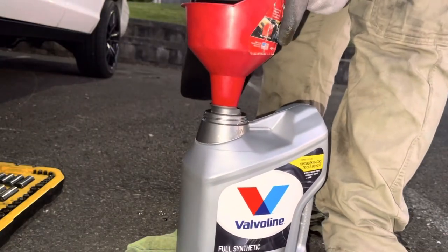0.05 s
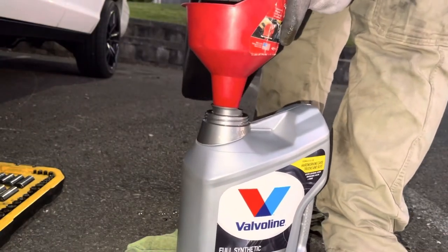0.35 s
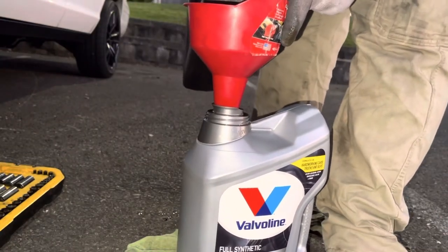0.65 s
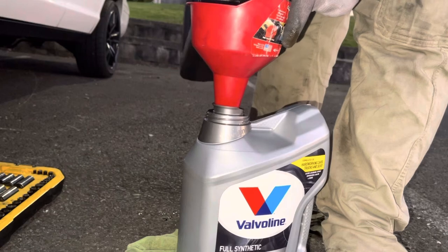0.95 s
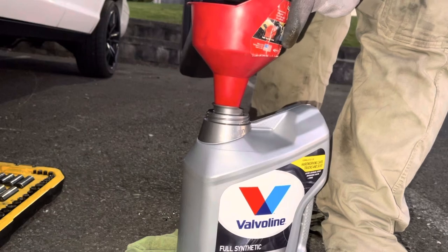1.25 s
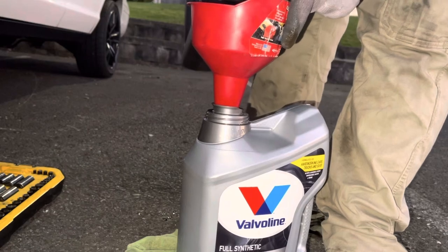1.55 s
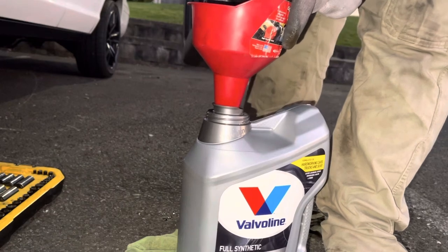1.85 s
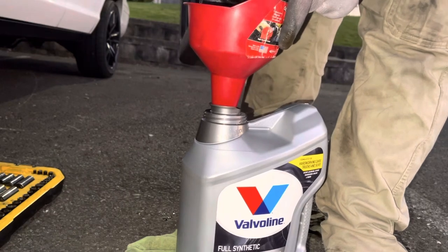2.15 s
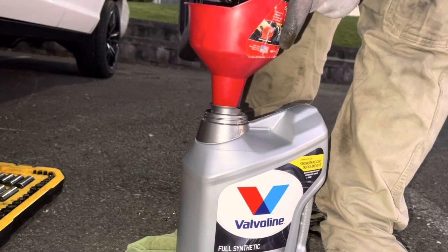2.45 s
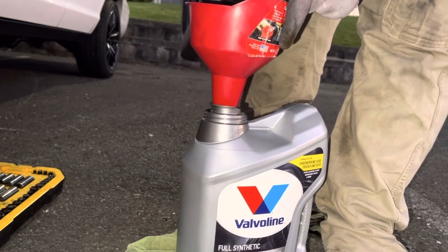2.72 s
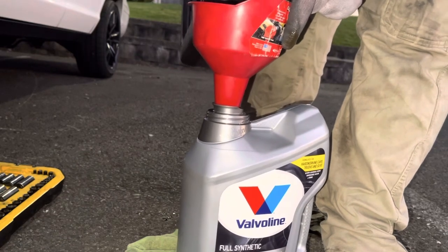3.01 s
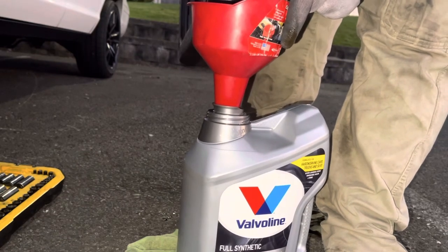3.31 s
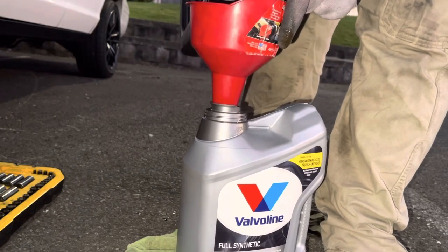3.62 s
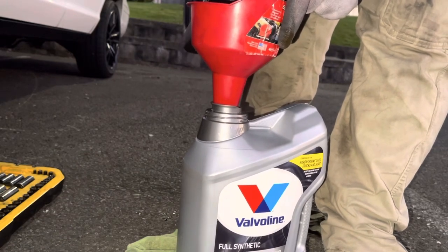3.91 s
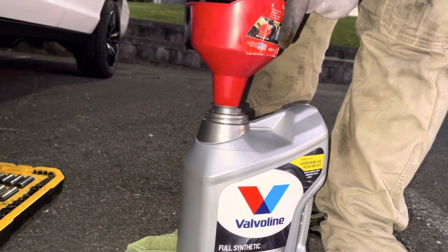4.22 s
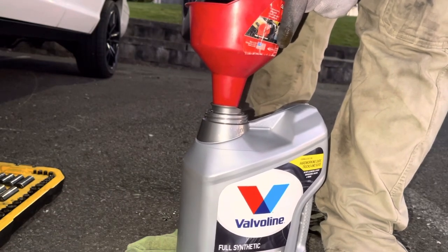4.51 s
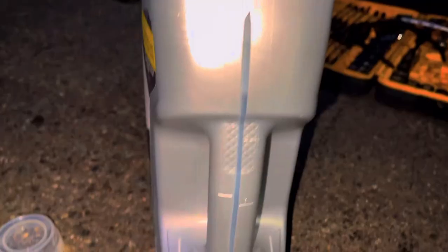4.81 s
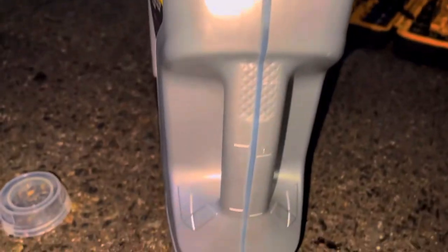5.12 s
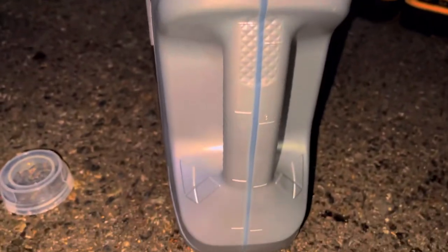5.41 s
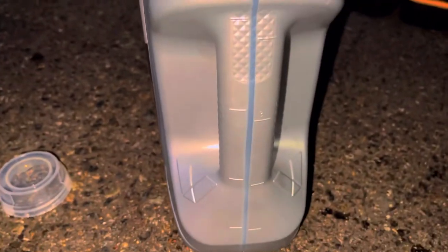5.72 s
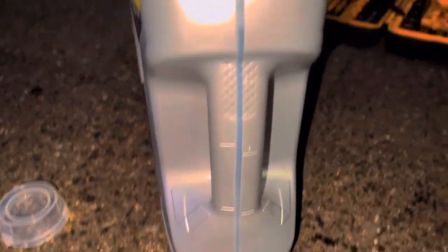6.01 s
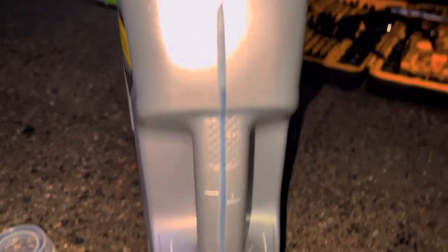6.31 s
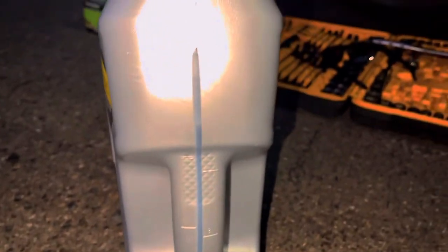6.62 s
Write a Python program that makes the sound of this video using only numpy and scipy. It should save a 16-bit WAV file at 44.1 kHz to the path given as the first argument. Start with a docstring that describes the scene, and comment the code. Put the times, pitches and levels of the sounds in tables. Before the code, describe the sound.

Light plastic clicks and rubbing outdoors over a low traffic rumble, followed by a jug's sharp knock and duller bump.

```python
"""On a driveway, a plastic funnel shifts in the neck of an oil jug: light clicks, rubbing and scrapes,
all tiny slips ringing through its shell. Then the jug knocks on the asphalt close by and rocks over grit
onto its base with a duller bump. Distant traffic rumbles throughout, joined by an engine's hum and one
faint bird whistle; a thin whine mostly fades near the end. The level dips once, after the last click."""
import sys
import numpy as np
from scipy import signal
from scipy.fft import rfft, irfft, next_fast_len
from scipy.io import wavfile
from scipy.ndimage import uniform_filter1d

SR = 44100
rng = np.random.default_rng(int(sys.argv[2]) if len(sys.argv) > 2 else 0)


def dump_mix(stems):
    """Bounce the given channels to the path in sys.argv[1] as a 16-bit WAV at rate SR."""
    frames = np.atleast_2d(stems).T  # one column per channel
    limited = np.clip(frames, -1, 1)  # hard clip at full scale
    pcm = np.round(limited * 32767).astype(np.int16)
    wavfile.write(sys.argv[1], SR, pcm)


N = 302110
TIME = np.arange(N) / SR


def undb(db):
    """Decibels to gain."""
    return 10 ** (np.asarray(db) / 20)


def unit(x):
    """Scale to an rms of one."""
    return x / np.sqrt(np.mean(x ** 2))


def curve(rows, column=1):
    """Automation: join the rows of a table by straight lines in time."""
    rows = np.array(rows)
    return np.interp(TIME, rows[:, 0], rows[:, column])


def along(points, hz):
    """Read (frequency, value) points on a log-frequency axis."""
    points = np.array(points)
    return np.interp(np.log(hz + 1), np.log(points[:, 0]), points[:, 1])


def shape(x, response):
    """Filter by a response given as a function of frequency."""
    size = next_fast_len(x.shape[-1])
    hz = np.arange(size // 2 + 1) * SR / size
    return irfft(rfft(x, size) * response(hz), size)[..., :x.shape[-1]]


def band(x, lo_hz, hi_hz):
    """Causal band-pass."""
    sos = signal.butter(2, [lo_hz, min(hi_hz, SR / 2 - 1)], "band", fs=SR, output="sos")
    return signal.sosfilt(sos, x)


def lowpass(x, hz):
    """Steep causal low-pass."""
    return signal.sosfilt(signal.butter(4, min(hz, SR / 2 - 1), fs=SR, output="sos"), x)


def walk(rate_hz):
    """Smooth random modulation with a spread near one."""
    knots = rng.standard_normal(512)
    drift = np.interp(TIME * rate_hz, np.arange(len(knots)), knots)
    return uniform_filter1d(drift, int(SR / rate_hz / 2)) * np.sqrt(2)


def grit(size, spread_db, apart):
    """Stereo grains of unequal strength, like tiny slips; a part reaches each side by its own path."""
    slips = rng.standard_normal((3, size)) * undb(spread_db * rng.standard_normal(size))
    return slips[0] + apart * slips[1:]


def pan(db):
    """Left and right gains; positive decibels lean left."""
    return undb(np.array([[db], [-db]]) / 2)


def add(out, s, sound):
    """Mix a sound in at time s."""
    start = int(s * SR)
    out[:, start:start + sound.shape[-1]] += sound[:, :N - start]


# tone of the road noise: (frequency [Hz], relative density [dB])
TRAFFIC_SPECTRUM = [(26, -30), (45, -5.5), (70, -1), (124, -5), (153, -10.5), (189, -12.5), (289, -17.5),
                    (341, -21), (690, -31.5), (1100, -38), (1810, -49.5), (3340, -58.5), (3760, -64.5),
                    (8380, -66.5), (12500, -87.5), (16200, -106), (22000, -120)]
# its stereo image: (frequency [Hz], left-right correlation [-1..1])
TRAFFIC_CORRELATION = [(60, 0.98), (130, 0.92), (290, 0.51), (450, 0.31), (700, -0.59), (1300, -0.36),
                       (2400, 0.24), (5000, 0.18), (14000, 0.41)]
# splits between bass, low mids, high mids and treble: (frequency [Hz])
TRAFFIC_CROSSOVERS = [150, 480, 900]
# fader rides: (time [s], bass gain [dB], low-mid gain [dB], high-mid gain [dB])
TRAFFIC_RIDES = [(0, 0.5, -3.5, 6), (1, 0.5, 1.5, -3), (1.7, -3, 0.5, -2), (3, 0, -3, 3),
                 (4.7, -2.5, 0.5, -3.5), (5, -0.5, 0.5, 4), (6.85, -1, 0.5, 3.5)]


def traffic(level_db=-42.5, bass_waver_db=-1.2, mids_waver_db=0.9, pan_db=0.8):
    """A bed of far road noise: centred bass and diffuse mids, each wavering on its own."""
    mid, side = (shape(rng.standard_normal(N), lambda f: undb(along(TRAFFIC_SPECTRUM, f)))
                 for _ in range(2))
    side = shape(side, lambda f: np.sqrt(2 / (1 + np.clip(along(TRAFFIC_CORRELATION, f), -.9, .9)) - 1))
    road = (mid + side * np.array([[1], [-1]])) / np.std(mid)
    bass, to_low_mids, to_high_mids = (shape(road, lambda f: 1 / (1 + (f / hz) ** 4))
                                       for hz in TRAFFIC_CROSSOVERS)
    rumble = bass * undb(curve(TRAFFIC_RIDES) + bass_waver_db * walk(5.9))
    low_mids = (to_low_mids - bass) * undb(curve(TRAFFIC_RIDES, column=2))
    high_mids = (to_high_mids - to_low_mids) * undb(curve(TRAFFIC_RIDES, column=3))
    roar = (low_mids + high_mids) * undb(mids_waver_db * walk(5.6))
    treble = road - to_high_mids
    return (rumble + roar + treble) * undb(level_db) * pan(pan_db)


# thin tones: (pitch [Hz], level [dB], drop near the end [dB])
WHINE_TONES = [(3350, -84, 26), (3460, -94.5, -1.5), (3280, -99.5, 1.5), (11200, -101, -1)]
# faint narrow bands of high hiss: (centre [Hz], width [Hz], level [dB])
HISS_BANDS = [(3314, 480, -88), (8480, 400, -93), (11770, 150, -103)]


def whine(fade_at_s=5.78, fade_s=0.23, hiss_drop_db=3):
    """Faint high tones, steady in pitch, with narrow hiss; the strongest fades out near the end."""
    fade = np.clip((TIME - fade_at_s) / fade_s, 0, 1)
    tones = sum(undb(db - drop_db * fade + .5 * walk(15)) * unit(np.sin(2 * np.pi * hz * TIME))
                for hz, db, drop_db in WHINE_TONES)
    hiss = 0
    for hz, width, db in HISS_BANDS:
        grains = grit(N, spread_db=-3.5, apart=1.0)
        hiss += undb(db) * unit(shape(grains, lambda f: 1 / (1 + (2 * (f - hz) / width) ** 2)))
    return tones + hiss * undb(-hiss_drop_db * fade)


# the funnel's plastic body resonances: (centre [Hz], width [Hz], gain [dB])
FUNNEL_MODES = [(238, 20.5, 9), (317, 26, 11.5), (422, 100, 3.5), (600, 142, 4.5), (1027, 133, 5.5),
                (1232, 136, 0.5), (1446, 137, 2), (1930, 140, -3), (2306, 390, -9), (3270, 100, -6.5),
                (3820, 570, -10.5), (5930, 900, -51), (8100, 1500, -30)]


def shell(x, stretch=1):
    """Ring the funnel's modes, which a squeeze stretches in pitch; neighbours swing in opposite senses."""
    def response(f):
        f = f / stretch
        return sum((-1) ** k * undb(db) * 1j * f * width / (hz ** 2 - f ** 2 + 1j * f * width)
                   for k, (hz, width, db) in enumerate(FUNNEL_MODES))
    return shape(x, response)


def click(wall_db, cone_db, rim_db, edge_db, slip_s, top_hz,
          rise_s=0.00011, scatter_db=-20, scatter_s=0.058, squeeze=0.053, soft_catch_db=-65):
    """A snap and a burst of slips through the funnel, with a faint scatter from the ground and car."""
    t = TIME[:SR // 5]
    slips = unit(grit(len(t), spread_db=5.0, apart=0.29)) * np.exp(-t / slip_s)
    scatter = rng.standard_normal((2, len(t))) * undb(scatter_db) * np.exp(-t / scatter_s)
    snap = undb(wall_db - soft_catch_db) * (t == t[SR // 1000])  # a harder catch lets go more cleanly
    contact = snap + (slips + scatter) * (1 - np.exp(-t / rise_s))
    ring = shell(contact, stretch=1 + squeeze * rng.uniform(-1, 1))
    # the place of contact sets how much the hollow cone, its wall, its rim and its edge take up
    cone, wall, rim = band(ring, 182, 470), band(ring, 930, 1590), band(ring, 2280, 3070)
    edge = lowpass(band(ring, 3400, 16000), top_hz)
    out = 0
    for part, db in ((cone, cone_db), (wall, 0), (rim, rim_db), (edge, edge_db)):
        peak_rms = np.sqrt(uniform_filter1d(np.mean(part ** 2, axis=0), size=440).max())
        out += part / peak_rms * undb(wall_db + db)
    return out


# click cues: (time [s], wall level [dB], cone over wall [dB], rim over wall [dB],
# edge over wall [dB], slip decay [s], edge high cut [Hz])
CLICK_CUES = [(0.116, -63, 8, -10, -27, 0.006, 4500), (0.222, -67, 17, -12, -30, 0.01, 4500),
              (0.445, -64.5, -3, -10, -30, 0.0067, 4500), (0.568, -69, 3, -16, -30, 0.0045, 4500),
              (0.753, -67.5, 19, -13, -30, 0.02, 4500), (2.184, -45, 7, -15, -29, 0.0073, 4800),
              (2.275, -51, -6, -13.5, -32, 0.0052, 4800), (2.565, -48.5, 12, -1.5, -17, 0.0054, 6000),
              (2.595, -45.5, 5.5, -13, -23, 0.0072, 6500), (2.659, -65, -4, 2, -10, 0.006, 7000),
              (2.954, -51, 10.5, -4, -13, 0.0051, 6500), (2.964, -49.5, 8, -11, -33, 0.0063, 6500),
              (2.985, -51, 7.5, -13, -15, 0.0043, 6500), (3.015, -45.5, -3.5, -11.5, -16.5, 0.0071, 6500),
              (3.057, -53, 9.5, -10, -22, 0.0031, 5500), (3.086, -48.5, 4, -10, -26, 0.0046, 5500),
              (3.163, -57.5, 1, -16, -28, 0.0056, 4500), (3.184, -54.5, -11, -13, -26, 0.0033, 4530),
              (3.216, -59, 5, -11, -23, 0.0026, 5000), (3.229, -46, 5, -13.5, -26, 0.0024, 5500),
              (3.268, -53.5, 2, -14, -34, 0.0037, 5000), (3.378, -57, 0, -12, -35, 0.0053, 4500),
              (3.433, -57, 7, -18, -20, 0.0043, 7100), (3.469, -52, 3, -26, -32, 0.0057, 4500),
              (3.636, -54.5, 3, -19, -30, 0.004, 4500), (3.935, -53, 1, -9, -27, 0.0036, 4500),
              (3.988, -55, -4, -12, -17, 0.005, 4500), (4.109, -59, 7, -13, -13, 0.0025, 4500),
              (4.134, -58, 11.5, 0.5, -17, 0.0079, 8500), (4.173, -53.5, 6.5, -21, -4.5, 0.0021, 10100),
              (4.25, -52, 9, -17, -26, .006, 5000), (4.266, -58, 7, -15, -24, 0.0033, 5000),
              (4.293, -67, 2, 0, -2, 0.0034, 8050), (4.36, -54, 1.5, -14, -23, 0.0068, 6500),
              (4.394, -55, -4, -16, -14, 0.0033, 9000), (4.414, -54.5, 5, -18, -28, 0.004, 5000),
              (4.443, -44, 5, -5, -16.5, 0.0039, 8050), (4.507, -47, 2.5, -10, -10.5, 0.0027, 8200),
              (4.545, -54, 7.5, -14, -17, 0.0026, 7400), (4.593, -53, 9, -6, -2, 0.0055, 9000),
              (4.66, -65, 9, 0.5, -18, 0.0041, 6000), (4.717, -57, 10, -11, -18, .003, 7000),
              (4.744, -50.5, 11, -3, -5, 0.0049, 8400), (4.785, -68.5, 2, 8.5, -14, 0.0091, 8000)]


def funnel_clicks(pan_db=-1.5):
    """The spout catches and lets go in the neck of the jug, a little to the right."""
    out = np.zeros((2, N))
    for s, *contact in CLICK_CUES:
        add(out, s, click(*contact))
    return out * pan(pan_db)


def bird(start_s=0.63, length_s=0.16, from_hz=1240, to_hz=1507, peak_db=-57.5,
         glide_s=0.0304, attack_s=0.036):
    """One short whistle from far off: it rises, levels out and dies away."""
    age = np.clip(TIME - start_s, 0, length_s)
    hz = to_hz + (from_hz - to_hz) * np.exp(-age / glide_s)
    envelope = np.interp(age, [0, attack_s, length_s], [0, 1, 0]) ** 2
    return np.sin(2 * np.pi * np.cumsum(hz) / SR) * envelope * undb(peak_db)


# the hum's pitch sinks slowly and steps down at the level dip: (time [s], base rate [Hz])
HUM_RATE = [(0, 32.2), (4.8, 31.2), (4.87, 29.7), (6.85, 27.8)]
# its partials: (multiple of the base rate [ratio], level [dB])
ENGINE_PARTIALS = [(2, -47.5), (4, -50.5), (6, -61.5), (7, -57)]


def engine(wander=0.0043, waver_db=-1.0, enters_s=0.87, swell_s=0.28):
    """A distant engine fades in and hums at multiples of its shaft speed; each partial wavers."""
    turns = np.cumsum(curve(HUM_RATE) * (1 + wander * walk(8.8))) / SR
    hum = sum(unit(np.sin(2 * np.pi * order * turns)) * undb(db + waver_db * walk(2.7))
              for order, db in ENGINE_PARTIALS)
    return hum * np.clip((TIME - enters_s) / swell_s, 0, 1)


# fader ride of the rubbing: (time [s], wall level [dB])
RUB_RIDE = [(2.08, -86), (2.2, -68), (2.23, -61), (2.28, -61), (2.31, -67), (2.5, -68.5), (2.78, -69.5),
            (2.88, -67), (3.05, -70), (3.7, -66), (4.05, -65), (4.5, -73), (4.68, -69), (4.81, -75),
            (4.83, -100)]
# hollow ring of the neck under it: (centre [Hz], width [Hz], level over wall [dB])
NECK_MODES = [(442, 64, 7), (1038, 140, -9), (2380, 350, -13.5)]


def funnel_rub(low_hz=800, top_hz=2500, squeeze=0.031, jerk_db=2.5):
    """The spout drags lightly in the neck with a soft crackle; the grip loosens and tightens."""
    drag = grit(N, spread_db=5, apart=0.66) * undb(jerk_db * walk(70))
    grip = np.pi / 4 * (1 + np.tanh(walk(5)))  # angle of an equal-power crossfade
    ring = np.cos(grip) * shell(drag, 1 - squeeze) + np.sin(grip) * shell(drag, 1 + squeeze)
    wall = unit(band(ring, low_hz, top_hz))
    neck = sum(undb(db) * unit(band(drag, hz - width / 2, hz + width / 2))
               for hz, width, db in NECK_MODES)
    return (wall + neck) * undb(curve(RUB_RIDE)) * (TIME > RUB_RIDE[0][0])


# scrape cues: (time [s], length [s], shell level [dB], rasp level [dB], neck level [dB],
# pitch of the squeezed shell [ratio])
SCRAPE_CUES = [(2.221, 0.055, -65, -83, -68, 1.0), (2.555, 0.086, -52, -66.5, -53, 0.88),
               (2.643, 0.042, -60, -72, -61, 1.1), (2.745, 0.065, -65, -91, -51, 0.85),
               (2.943, 0.11, -53, -71, -56.5, 0.95), (3.002, 0.081, -51.5, -74, -52, 1.06),
               (3.236, 0.073, -56.5, -78, -50, 0.86), (4.13, 0.08, -58.5, -57, -80, 1.02),
               (4.356, 0.12, -60, -81, -47.5, 1.04), (4.441, 0.12, -49, -63.5, -50.5, 0.92),
               (4.589, 0.054, -52, -64, -61, 0.92), (4.745, 0.11, -57, -67.5, -74, 1.08)]


def funnel_scrapes(grab_s=0.004, jerk_db=3):
    """Harder pushes make a dense crunch that eases off; the spout's edge rasps, the neck rings hollow."""
    out, t = np.zeros((2, N)), TIME[:SR // 5]
    for start, length, shell_db, rasp_db, neck_db, stretch in SCRAPE_CUES:
        drag = grit(len(t), spread_db=6, apart=1.0) * undb(jerk_db * walk(194)[:len(t)])
        body = band(shell(drag, stretch), 260, 3400)
        rasp, neck = band(drag, 1500, 6000), band(drag, 380, 520)
        age = t[:int(length * SR)]
        crunch = sum(undb(db) * unit(part[:, :len(age)])
                     for part, db in ((body, shell_db), (rasp, rasp_db), (neck, neck_db)))
        envelope = (1 - np.exp(-age / grab_s)) * (1 - (age / length) ** 1.7)
        add(out, start, crunch * envelope)
    return out


# the jug's body: (pitch [Hz], time to fall 60 dB [s], gain on a corner hit [dB], on a base hit [dB])
JUG_MODES = [(84.4, 0.13, -7.5, -8.5), (179, 0.046, -8.5, -5), (240, 0.037, -34, -11.5),
             (333.4, 0.025, 7.5, -3), (382, 0.036, -32.5, 3), (498, 0.023, -3.5, 0.5),
             (610, 0.038, -8.5, -16), (699, 0.016, 9.5, -36), (826, 0.043, -15, -40),
             (1212, 0.035, -32, -21), (1290, 0.023, -19, -26), (1580, 0.0086, -14.5, -36),
             (1784, 0.018, -40, -31.5), (2420, 0.019, -24, -36), (2910, 0.015, -20.5, -58),
             (3200, 0.018, -25, -25), (3550, 0.02, -45.5, -34), (4580, 0.016, -24, -57.5),
             (5370, 0.014, -28, -71), (5870, 0.01, -16.5, -52), (6200, 0.012, -26.5, -61),
             (6520, 0.015, -20.5, -58), (6840, 0.017, -30, -60), (7480, 0.012, -35, -53.5),
             (9350, 0.0073, -45, -58), (12400, 0.008, -46.5, -69)]


def jug_ring(t, place, pan_db, bend_s=0.0012, rise_cycles=0.98, right_lag_s=0.00005):
    """The struck jug rings in damped modes, balanced by where the blow lands."""
    ring = np.zeros((2, len(t)))
    for hz, t60, corner_db, base_db in JUG_MODES:
        # bending waves are slower at low pitch, so the deep modes arrive late
        delay_s = bend_s * max(np.sqrt(1000 / max(hz, 250)) - 1, 0)
        age = np.maximum(t - delay_s - np.array([[0], [right_lag_s]]), 0)
        envelope = (1 - np.exp(-age * hz / rise_cycles)) * np.exp(-np.log(1000) * age / t60)
        gain = undb(corner_db + place * (base_db - corner_db))
        sides = pan(pan_db * np.clip((hz - 250) / 400, 0, 1.2))  # the low end stays centred
        ring += gain * np.sin(2 * np.pi * hz * age) * envelope * sides
    return ring


def jug_crack(t, snap_db=-24, snap_s=0.00089, buzz_db=-35, buzz_s=0.0073,
              scatter_db=-51, scatter_s=0.049):
    """A corner snaps against grit; the walls buzz briefly and the surroundings scatter a faint tail."""
    snap = rng.standard_normal((2, len(t))) * undb(snap_db) * t / snap_s * np.exp(1 - t / snap_s)
    decay = undb(buzz_db) * np.exp(-t / buzz_s) + undb(scatter_db) * np.exp(-t / scatter_s)
    tail = lowpass(unit(grit(len(t), spread_db=6, apart=0.92)) * decay, 7400)
    return band(snap + tail, 300, 7000)


# impact cues: (time [s], gain [dB], contact high cut [Hz], place [0 corner..1 base], pan to left [dB])
KNOCK_CUES = [(6.011, -2, 11500, 0.11, 5.5), (6.0303, -9, 1390, 0.47, 8.5), (6.052, -19, 1068, 0.68, 3.5),
              (6.0977, -12.5, 1276, 0.71, 3), (6.1095, -16, 1310, 0.78, -9),
              (6.1170, -13.5, 1020, 0.86, 21), (6.1248, -3, 1266, 0.85, 8.5)]


def jug_knocks():
    """The jug hits on a corner, then rocks onto its base; soft contacts leave the high modes still."""
    out, t = np.zeros((2, N)), TIME[:SR // 3]
    for s, db, contact_hz, place, pan_db in KNOCK_CUES:
        crack = jug_crack(t) * max(1 - place, 0) * pan(pan_db / 2)
        add(out, s, undb(db) * lowpass(jug_ring(t, place, pan_db) + crack, contact_hz))
    return out


def jug_rocking(start_s=6.098, length_s=0.036, level_db=-44.5, top_hz=1500, pan_db=4):
    """The base rolls over loose grit, harder and harder until it lands."""
    out, t = np.zeros((2, N)), TIME[:SR // 10]
    rolling = t < length_s
    weight = np.sqrt(t / length_s) * rolling
    grind = band(grit(len(t), spread_db=1.5, apart=.4) * weight, 350, 3000)
    grind = lowpass(lowpass(grind, top_hz), top_hz)
    add(out, start_s, grind / np.std(grind[:, rolling]) * undb(level_db) * pan(pan_db))
    return out


def scene(funnel_top_hz=9500, dip_at_s=4.828, dip_s=0.007):
    """Funnel and jug in front of the outdoor bed; the level dips once for an instant."""
    funnel = funnel_clicks() + funnel_rub() + funnel_scrapes()
    funnel = lowpass(funnel, funnel_top_hz)  # steep high cut on all the funnel sounds
    outdoors = traffic() + engine() + whine() + bird()
    dip = 1 - np.exp(-((TIME - dip_at_s) / dip_s) ** 2)
    return (funnel + jug_knocks() + jug_rocking() + outdoors) * dip


def record(dry, low_hz=44, top_hz=16000):
    """Master EQ: thin the deepest bass and cut the top."""
    thinned = signal.sosfilt(signal.butter(4, low_hz, "high", fs=SR, output="sos"), dry)
    return signal.sosfilt(signal.ellip(8, .2, 70, top_hz, fs=SR, output="sos"), thinned)


dry = scene()
out = record(dry)
dump_mix(out)
```